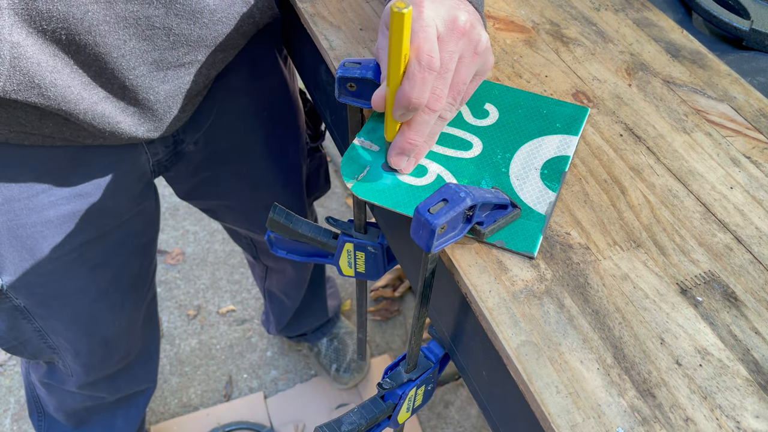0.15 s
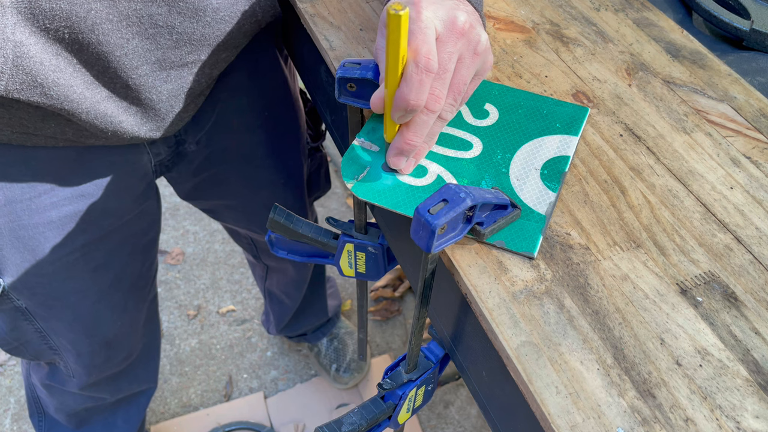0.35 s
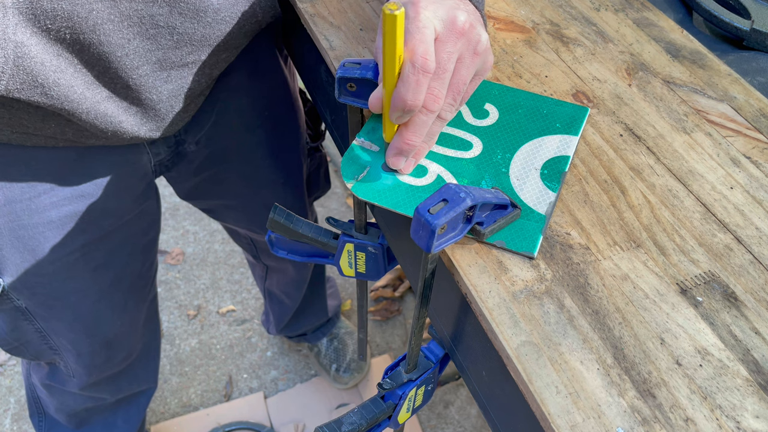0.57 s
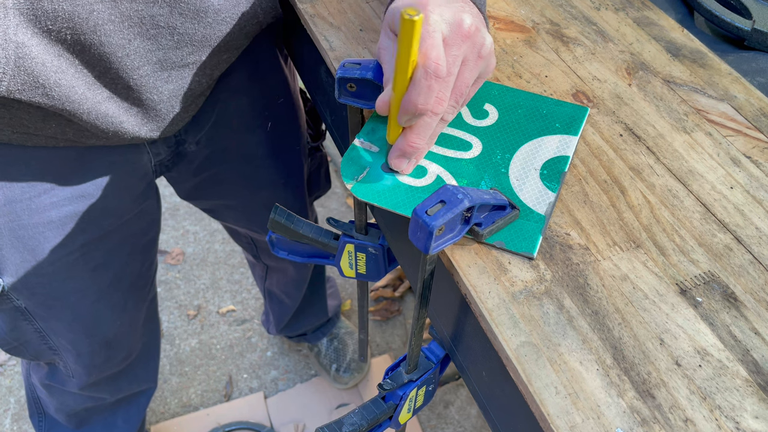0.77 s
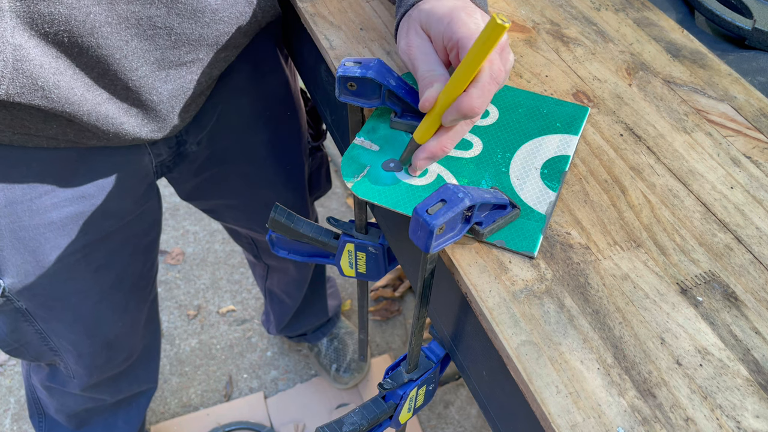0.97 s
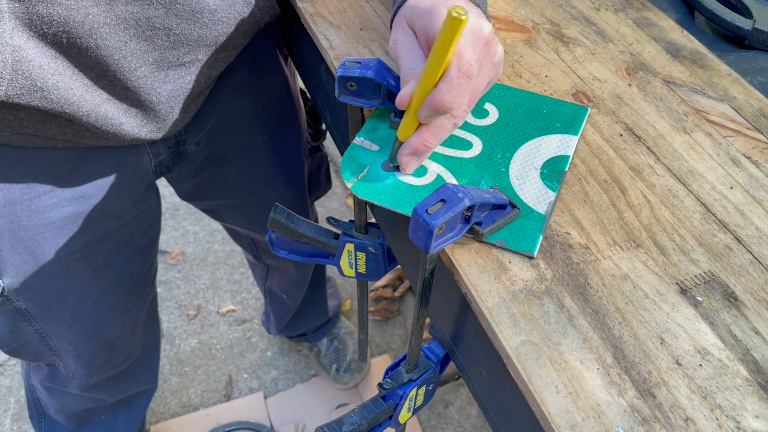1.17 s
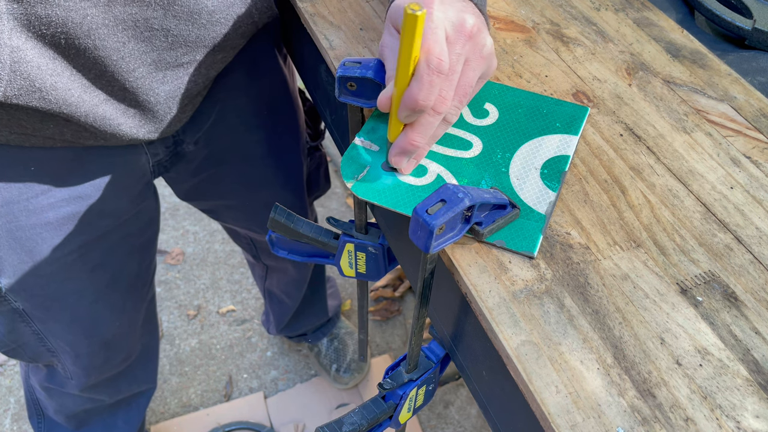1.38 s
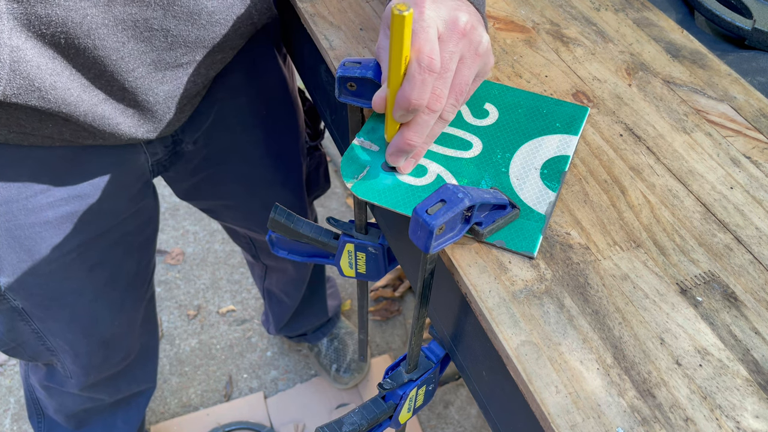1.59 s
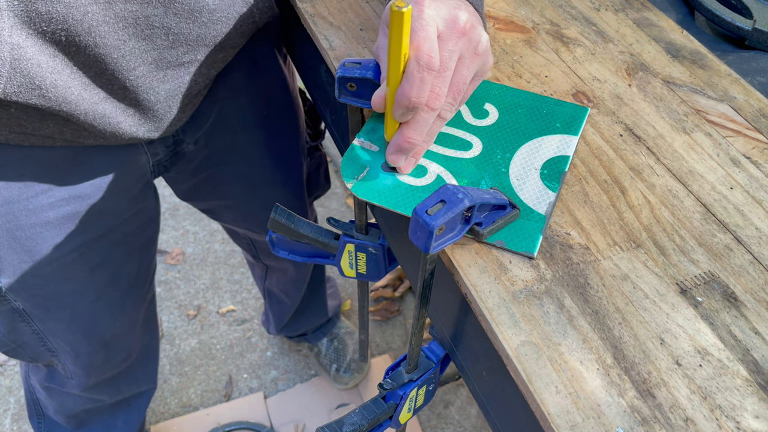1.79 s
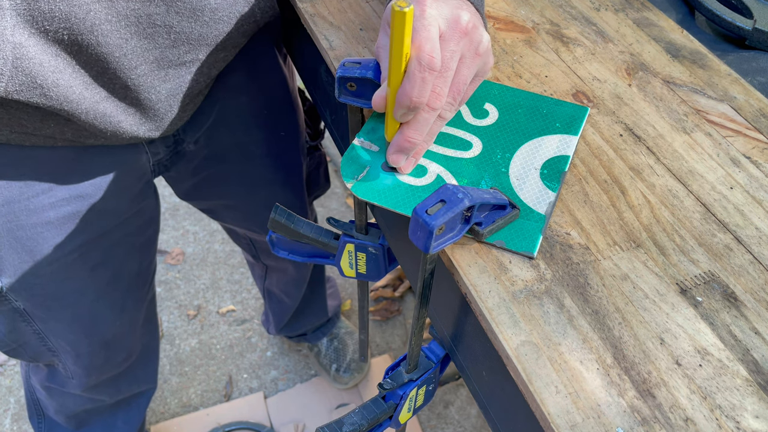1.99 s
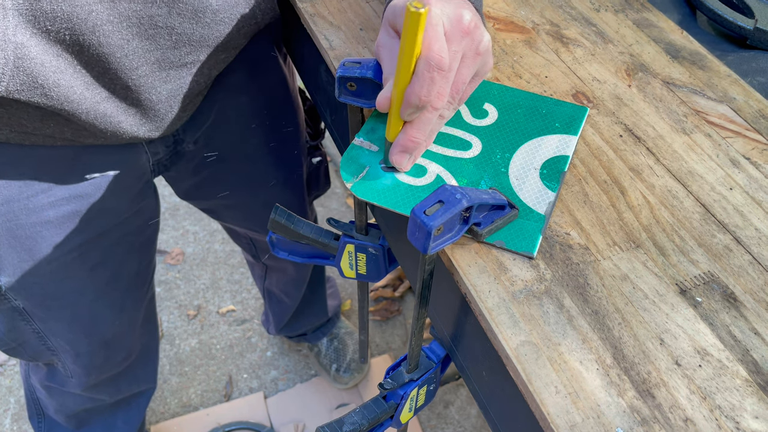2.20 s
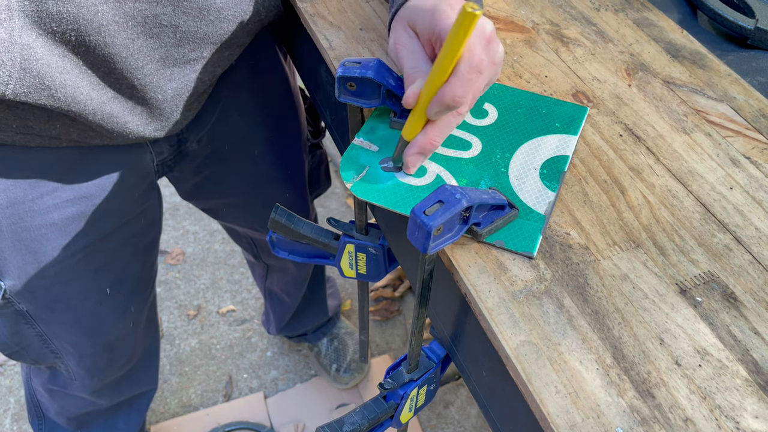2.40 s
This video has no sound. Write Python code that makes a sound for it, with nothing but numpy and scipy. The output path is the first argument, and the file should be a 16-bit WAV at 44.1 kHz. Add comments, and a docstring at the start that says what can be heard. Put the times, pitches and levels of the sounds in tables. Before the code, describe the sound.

Four loud, bright hammer blows on a punch and metal plate, the second and fourth stuttering into quick clacks, with faint taps, loose clamp rattles and low bench rumble between, heard close in a workshop.

```python
"""Workshop, wooden bench: a hammer drives a steel punch into a clamped metal plate. Four hard blows, two chattering,
are sums of swelling plate, punch and hammer modes plus a noise crack; bench and room answer as dying noise.
Light taps between are ticks, knocks and thuds. Loose rattling, rumble and hiss are level-shaped noise;
a faint whistle is a wavering sine. Peaks clip softly."""
import sys
import numpy as np
from scipy import signal
from scipy.fft import rfft, irfft, next_fast_len
from scipy.io import wavfile
from scipy.ndimage import uniform_filter1d, map_coordinates

SR = 44100
rng = np.random.default_rng(int(sys.argv[2]) if len(sys.argv) > 2 else 0)


def linear_from_db(decibels):
    """Turn decibels (scalar or array-like) into linear amplitude factors; 0 gives 1."""
    return 10 ** (np.asarray(decibels, float) / 20)


def transcribe(signal):
    """Save signal, clipped to [-1, 1], as a 16-bit WAV file at the path in sys.argv[1]."""
    frames = np.atleast_2d(signal).T
    limited = np.clip(frames, -1, 1)
    pcm = np.round(limited * 32767).astype(np.int16)
    wavfile.write(sys.argv[1], SR, pcm)


N = 108045


def unit(x):
    """Scale to rms 1."""
    return x / np.sqrt(np.mean(x ** 2) + 1e-20)


def along(points, hz):
    """Interpolate (Hz, value) points on a log frequency axis."""
    f, v = np.transpose(points)
    return np.interp(np.log(hz + 1), np.log(f + 1), v)


def curve(rows):
    """Interpolate (s, value) rows, one value per sample."""
    s, v = np.transpose(rows)
    return np.interp(np.arange(N) / SR, s, v)


def filtered(x, response):
    """Multiply the spectrum of x by response(Hz)."""
    n = x.shape[-1]
    m = next_fast_len(n + 4096)
    return irfft(rfft(x, m) * response(np.fft.rfftfreq(m, 1 / SR)), m)[..., :n]


def noise(spectrum, alike, size):
    """Coloured stereo noise of rms 1; alike sets the left-right correlation by frequency."""
    def mid_side_gain(hz):
        angle = np.arccos(np.clip(along(alike, hz), -1, 1)) / 2
        return linear_from_db(along(spectrum, hz)) * [np.cos(angle), np.sin(angle)]

    mid, side = filtered(rng.standard_normal((2, size)), mid_side_gain)
    return unit(np.array([mid + side, mid - side]))


def wobble(rate_hz, size):
    """Smooth random curve through rate_hz random knots a second."""
    knots = rng.standard_normal(int(size * rate_hz / SR) + 4)
    return map_coordinates(knots, [np.arange(size) * rate_hz / SR])


def swell(t, peak_s):
    """Envelope that rises to 1 at peak_s, then collapses."""
    u = t / peak_s
    return (u * np.exp(1 - u)) ** 2.53


def add(out, x, s):
    """Mix x into out at time s, trimmed to fit."""
    i = round(s * SR)
    start = max(i, 0)
    x = x[..., max(-i, 0):][..., :N - start]
    out[..., start:start + x.shape[-1]] += x


# left over right of hits: f/Hz, level/dB
HIT_LR = [(60, -0.5), (150, -7), (380, 2), (950, 0), (2380, -4), (5980, -7.5), (15000, -1)]
# phase by which left leads: f/Hz, lead/rad
HIT_LEAD = [(300, 0.29), (780, 0.18), (1000, 2), (2000, 1.7), (3000, 0.47), (3800, 1.5), (5750, 1.1),
            (6500, 0.26), (8200, 1.27), (9350, 1.84)]


def tone(t, hz, blur_hz):
    """Stereo mode as a sine of random start phase; blur_hz sets a random phase walk that widens its line."""
    steps = uniform_filter1d(rng.standard_normal(len(t)), size=40)
    walk = np.cumsum(steps) * np.sqrt(2 * np.pi * blur_hz / SR)
    side = np.array([[.5], [-.5]])
    phase = 2 * np.pi * (hz * t + rng.random()) + walk + side * along(HIT_LEAD, hz)
    return linear_from_db(side * along(HIT_LR, hz)) * np.sin(phase)


# left-right correlation of tails and rattling: f/Hz, correlation
TAIL_ALIKE = [(40, 0.34), (120, 0.82), (300, .6), (950, 0.057), (3770, 0.25), (15000, .05)]


def dying(spectrum, t60, rise_s):
    """One second of stereo noise, each frequency decaying at its own T60."""
    top_hz = 12300
    hz, t, z = signal.stft(noise(spectrum, TAIL_ALIKE, size=SR), SR, nperseg=512)
    decay = linear_from_db(-60 * t / np.maximum(along(t60, hz), .01)[:, None])
    x = signal.istft(z * (hz < top_hz)[:, None] * decay, SR, nperseg=512)[1][:, :SR]
    return x * (1 - np.exp(-np.arange(SR) / SR / rise_s))


# plate modes: f/Hz, level/dB, looser (1) or not (0)
PLATE = [(375, -10, 0), (770, -4, 0), (980, 0, 0), (1340, -11, 1), (1530, -10, 1), (1975, -3, 0),
         (2280, -8, 1), (2550, -4, 1), (2900, -6, 1), (3520, -5, 1), (3810, -3, 0), (4050, -9, 1),
         (4270, -5, 1), (4590, -7, 1), (4870, -8, 0)]
# centres of knock, low, middle and high mode groups: f/Hz
GROUP_HZ = [770, 980, 2000, 3900]


def plate_modes(t, long, group_db, loose_db):
    """Plate modes swell and collapse; higher modes peak sooner, levels vary by 1 dB."""
    peak_s_1khz, slope = 0.0026, 0.055  # peak time at length factor 1
    group = list(zip(GROUP_HZ, group_db))
    out = 0
    for hz, level_db, loose in PLATE:
        level_db = level_db + along(group, hz) + loose * loose_db + rng.normal()
        peak_s = long * peak_s_1khz * (1000 / hz) ** slope
        out = out + linear_from_db(level_db) * swell(t, peak_s) * tone(t, hz, 0)
    return out


def tool_ring(t, long, modes):
    """Steel modes of a tool swell and collapse together."""
    return swell(t, long * 0.0016) * sum(linear_from_db(level_db) * tone(t, hz, 0) for hz, level_db in modes)


# punch modes: f/Hz, level/dB
PUNCH = [(5750, 0), (6500, -4), (7100, -9)]


def punch_ring(t, long, loose_db):
    """Punch modes; those above the first follow half the dB of the looser plate modes."""
    return tool_ring(t, long, PUNCH[:1]) + linear_from_db(loose_db / 2) * tool_ring(t, long, PUNCH[1:])


# hammer modes: f/Hz, level/dB
HAMMER = [(8200, -8.5), (9350, 0.8)]


def hammer_ring(t, long):
    """High modes of the hammer."""
    return tool_ring(t, long, HAMMER)


# crack spectrum: f/Hz, level/dB
CRACK = [(180, -35.5), (300, -23.5), (985, -1), (3240, -9.5), (6370, -9), (7800, -3.5), (9170, -17.5),
         (11000, -15.5), (13000, -29), (15600, -42.5)]


def crack_burst(t, long):
    """Swelling noise burst, spread left to right by level and delay."""
    left_lag_s = .00007
    mono = noise(CRACK, [(1000, 0.94)], size=len(t))[0] * swell(t, long * 0.0028)

    def left_right(hz):
        half = linear_from_db(along(HIT_LR, hz) / 2) * np.exp(-1j * np.pi * hz * left_lag_s)
        return np.array([half, 1 / half])

    return filtered(mono, left_right)


# steel ringing on: f/Hz, level/dB, T60/s
AFTER_RING = [(1950, -8, 0.25), (4050, -3, 0.3), (5820, 2, 0.12), (6420, -3, 0.1), (7390, -12, 0.066),
              (9400, -4, 0.07), (11300, -17, 0.1)]


def steel_after_ring(t):
    """Blurred steel modes decay exponentially; levels vary by 5.5 dB."""
    return sum(linear_from_db(level_db + 5.5 * rng.normal() - 60 * t / t60_s) * tone(t, hz, 170)
               for hz, level_db, t60_s in AFTER_RING)


# bench spectrum: f/Hz, level/dB
BENCH = [(18, -51), (30, -18.5), (168, 0.5), (215, -3.5), (545, -14.5), (616, -9), (845, -20.5),
         (1120, -22.5), (1220, -24), (2000, -25), (2600, -54), (4400, -120)]
# bench decay: f/Hz, T60/s
BENCH_T60 = [(50, .9), (150, 0.46), (400, 0.31), (1500, 0.33)]


def bench_boom():
    """The pushed bench booms: low-heavy dying noise."""
    return dying(BENCH, BENCH_T60, rise_s=0.00067)


# room clatter spectrum: f/Hz, level/dB
ROOM = [(240, -29.5), (400, -5), (621, -8), (701, -12), (867, -6.5), (4960, -16), (5950, -13.5),
        (11400, -19), (15000, -95)]
# room decay: f/Hz, T60/s
ROOM_T60 = [(300, 0.33), (1500, 0.2), (3000, 0.26), (6000, 0.28), (9500, 0.06), (11500, 0.24)]


def room_clatter():
    """Clatter in the room: lumpy dying noise."""
    return linear_from_db(1.5 * wobble(70, size=SR)) * dying(ROOM, ROOM_T60, rise_s=0.0053)


# contacts of hammer, punch and plate: t/s, length factor, plate knock, low, middle, high modes level/dB,
# looser modes level/dB, punch, hammer, crack, bench, room clatter, steel ringing on level/dB
CONTACTS = [(0.2376, 1.18, -4, -4.5, -8, -5, 0, -8.5, -1, -2.5, -16.5, -28.5, -53.5),
            (0.6415, 2.8, -21.5, -12.5, -18.5, -12, -12, -18, -37.5, -19.5, -31, -36, -55.5),
            (0.6464, 1.8, -17, -8, -11.5, -7.5, -9.5, -2.5, -31, -21.5, -21, -32.5, -39),
            (0.654, 1.3, -19, -14, -22, -21, -9.5, -19.5, -9.5, -10.5, -31.5, -33.5, -47),
            (0.662, 1.2, -20.5, -24, -25.5, -21.5, -1.5, -21.5, -27.5, -16.5, -32.5, -30, -47.5),
            (1.7421, 1.19, -6, -3.5, 0.5, -9, -1, -19.5, -2, -2.5, -17, -26, -44.5),
            (2.115, 1.8, -21, -26.5, -16, -24.5, 0, -23.5, -40, -21, -37.5, -39.5, -53),
            (2.12, 1.4, -7.5, -24, -16, -22.5, 2.5, -9.5, -2, -11, -23, -30, -47),
            (2.1253, 0.95, -10, -20, -13, -22, 4, -13.5, -21.5, -17.5, -25.5, -28.5, -46),
            (2.129, 1.1, -17.5, -19, -21, -24, 4.5, -15.5, -21.5, -15.5, -38, -26.5, -44.5)]


def blows():
    """Each contact excites plate, punch, hammer, crack, bench and room."""
    out, t = np.zeros((2, N)), np.arange(SR // 4) / SR
    for row in CONTACTS:
        s, long, *group_db = row[:6]
        loose_db, punch_db, hammer_db, crack_db, bench_db, room_db, after_db = row[6:]
        hit = plate_modes(t, long, group_db, loose_db)
        hit = hit + linear_from_db(punch_db) * punch_ring(t, long, loose_db)
        hit = hit + linear_from_db(hammer_db) * hammer_ring(t, long)
        hit = hit + linear_from_db(crack_db) * crack_burst(t, long)
        hit = hit + linear_from_db(after_db) * steel_after_ring(t)
        add(out, hit, s)
        add(out, linear_from_db(bench_db) * bench_boom() + linear_from_db(room_db) * room_clatter(), s)
    add(out, linear_from_db(-19.5) * bench_boom(), -0.086)  # a blow just before the start still booms
    return out


# tick spectrum: f/Hz, level/dB
TAP_TICK = [(590, -50), (1000, 1), (4160, -19), (5620, -21), (6270, -13), (9560, -14.5), (11000, -28),
            (14300, -103), (22000, -120)]
# steel modes of a tap: f/Hz, level/dB
TAP_MODES = [(1970, -8), (2550, -5), (3210, -4), (3800, -5), (4250, -2), (4570, -3), (5220, -13),
             (6260, 1.5), (6970, -10), (9380, 4)]


def steel_tick(t, ring_db):
    """Grainy noise tick plus steel modes that ring briefly."""
    grain = linear_from_db(-3 + 4 * wobble(700, size=len(t)))
    grit = grain * noise(TAP_TICK, [(1000, 0.25)], size=len(t)) * swell(t, 0.0016)
    ring = sum(linear_from_db(level_db + 2.6 * rng.normal()) * tone(t, hz, 0) for hz, level_db in TAP_MODES) / 2
    ring_t60_s, ring_rise_s = .04, .0008
    ring = ring * linear_from_db(-60 * t / ring_t60_s) * (1 - np.exp(-t / ring_rise_s))
    return grit + linear_from_db(ring_db) * ring


def tap_knock(t, hz):
    """One blurred mode that swells and collapses."""
    return tone(t, hz, 60) * swell(t, .004)


# thud spectrum: f/Hz, level/dB
TAP_BODY = [(59, -35), (100, -2), (311, 1.5), (814, -10.5), (943, -24), (998, -58), (1040, -30.5),
            (1500, -38.5), (1950, -80), (3300, -120)]
# thud decay: f/Hz, T60/s
TAP_T60 = [(150, 0.68), (400, 0.19), (1000, 0.1)]


def bench_thud():
    """Wooden dying noise that holds, then drops a further 8 dB."""
    hold_s, drop_db = .075, -8
    t = np.arange(SR) / SR
    hold = linear_from_db(drop_db * (1 - np.exp(-(t / hold_s) ** 4)))
    return hold * dying(TAP_BODY, TAP_T60, rise_s=0.0069)


# light taps and rattles: t/s, tick level/dB, thud level/dB, knock f/Hz, knock level/dB, ring over tick level/dB
TAPS = [(0.391, -73, -35, 764, -31, 0), (0.727, -35, -61, 2500, -46, -8), (0.766, -36.5, -63, 5180, -42, 3),
        (0.882, -71, -39, 151.4, -29.5, 0), (1.26, -73, -40, 795, -46.5, -6),
        (1.4548, -45, -29, 780, -38, -7), (1.455, -70, -48, 1970, -44, -9), (1.89, -55, -46, 900, -41, -16),
        (2.232, -41, -44.5, 6370, -48, 3), (2.249, -34.5, -52, 6200, -34.5, 3),
        (2.2535, -36.5, -62, 4200, -49, 1), (2.257, -42, -62, 5190, -38, 5.5)]


def taps():
    """Each tap is a steel tick, a pitched knock and a bench thud."""
    out, t = np.zeros((2, N)), np.arange(SR // 10) / SR
    for s, tick_db, body_db, hz, knock_db, ring_db in TAPS:
        add(out, linear_from_db(tick_db) * steel_tick(t, ring_db) + linear_from_db(knock_db) * tap_knock(t, hz), s)
        add(out, linear_from_db(body_db) * bench_thud(), s)
    return out


# loose rattling of clamps and bench: t/s, level/dB
RATTLE_LEVEL = [(0.0, -59), (0.28, -70), (0.37, -42), (0.5, -45.5), (0.7, -65.5), (0.8, -37.5), (0.85, -38),
                (0.97, -45.5), (1.03, -54.5), (1.24, -74), (1.77, -71.5), (1.93, -49.5), (2.16, -67),
                (2.29, -37.5), (2.45, -47.5)]
# rattling spectrum: f/Hz, level/dB
RATTLE = [(120, -27), (200, 1), (291, -6), (688, -9.5), (843, -14.5), (1440, -15), (1650, -31),
          (3000, -33.5), (3900, -60.5), (6600, -120)]


def rattling():
    """Loose clamps and bench: unevenly modulated noise."""
    lumps = linear_from_db(3.5 * wobble(45, size=N))
    return linear_from_db(curve(RATTLE_LEVEL)) * unit(lumps * noise(RATTLE, TAIL_ALIKE, size=N))


# left-right correlation of rumble and hiss: f/Hz, correlation
ALIKE = [(40, 0.4), (120, 1), (300, 1), (950, 0.082), (3770, 0.066), (15000, .05)]
# rumble: t/s, level/dB
RUMBLE_LEVEL = [(0.0, -61), (0.33, -33), (0.48, -36), (0.8, -42), (1.09, -44.5), (1.25, -54), (1.55, -57),
                (1.77, -56.5), (1.92, -50.5), (2.14, -49), (2.35, -40), (2.45, -47)]
# rumble spectrum: f/Hz, level/dB
RUMBLE = [(15, -50), (25, -19), (114, 0.5), (156, -11), (267, -23), (311, -16.5), (343, -30), (500, -38),
          (650, -63), (1100, -120)]


def rumble():
    """Lumpy low noise."""
    lumps = linear_from_db(1.5 * wobble(23, size=N))
    return linear_from_db(curve(RUMBLE_LEVEL)) * unit(lumps * noise(RUMBLE, ALIKE, size=N))


# hiss: t/s, level/dB
HISS_LEVEL = [(0.0, -49), (0.38, -46), (0.67, -49.5), (0.78, -46), (0.97, -54), (1.08, -61.5), (1.3, -61.5),
              (1.68, -60), (2.16, -56), (2.27, -42), (2.45, -54)]
# hiss spectrum: f/Hz, level/dB
HISS = [(240, -41), (400, -9), (909, -5), (1150, -7), (2940, -8), (3330, -9), (3520, -9), (9160, -20),
        (10500, -44.5), (13600, -89.5), (22000, -120)]


def hiss():
    """Broad noise on a slow level curve."""
    return linear_from_db(curve(HISS_LEVEL)) * noise(HISS, ALIKE, size=N)


# faint whistle: t/s, f/Hz, level/dB
WHISTLE = [(0, 3300, -84.5), (0.4, 3420, -80.5), (0.43, 3400, -60), (0.47, 3350, -61), (0.49, 3300, -82),
           (0.52, 3290, -61), (0.545, 3270, -62), (0.565, 3270, -78), (0.59, 3270, -63),
           (0.659, 3280, -84.5), (1.05, 3400, -84.5), (1.1, 3360, -72.5), (1.25, 3310, -73.5),
           (1.4, 3230, -81.5), (2.45, 3270, -88.5)]


def whistle():
    """Thin sine that wavers in pitch and level, coming and going."""
    s, hz, db = np.transpose(WHISTLE)
    t = np.arange(N) / SR
    pitch_hz = np.interp(t, s, hz) + 25 * wobble(60, size=N)
    level_db = np.interp(t, s, db) + 2.5 * wobble(40, size=N)
    return linear_from_db(level_db) * np.sin(2 * np.pi * np.cumsum(pitch_hz) / SR)


def scene():
    """Sum of all sources."""
    return blows() + taps() + rattling() + rumble() + hiss() + whistle()


def roll_off(x):
    """The treble ends steeply here."""
    return signal.sosfilt(signal.butter(12, 15700, fs=SR, output="sos"), x)


def record(dry):
    """Peaks clip softly towards 1, then the top treble rolls off."""
    treble_top_hz = 15000
    clipped = dry / (1 + np.abs(dry) ** 6) ** (1 / 6)
    dulled = filtered(clipped, lambda hz: 1 / (1 + (hz / treble_top_hz) ** 12))
    return roll_off(dulled)


dry = scene()
out = record(dry)
transcribe(out)
```